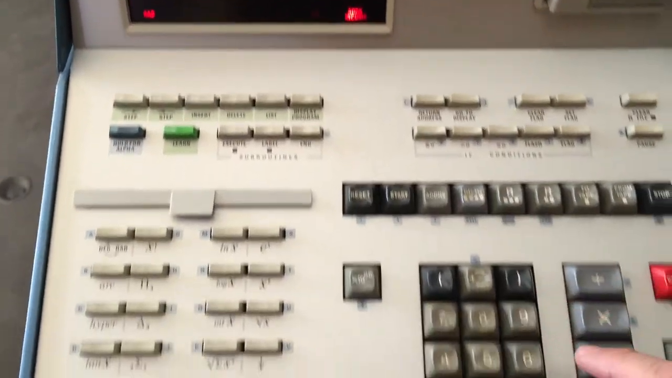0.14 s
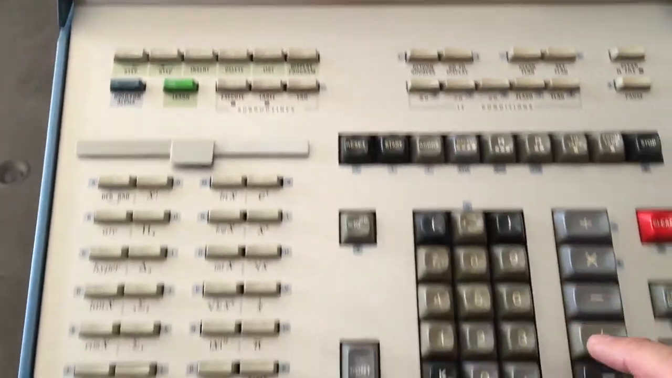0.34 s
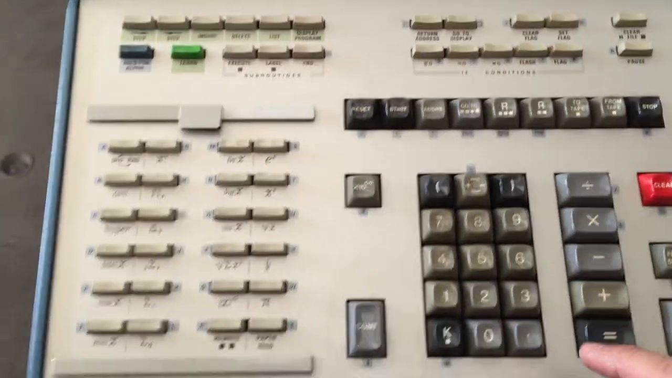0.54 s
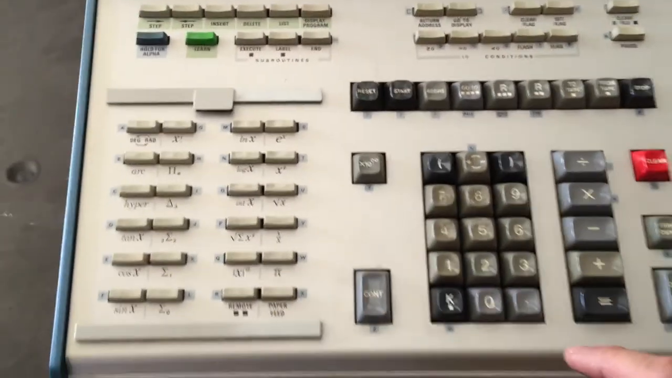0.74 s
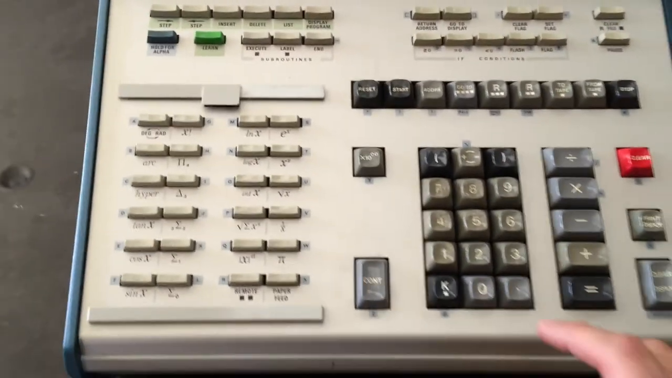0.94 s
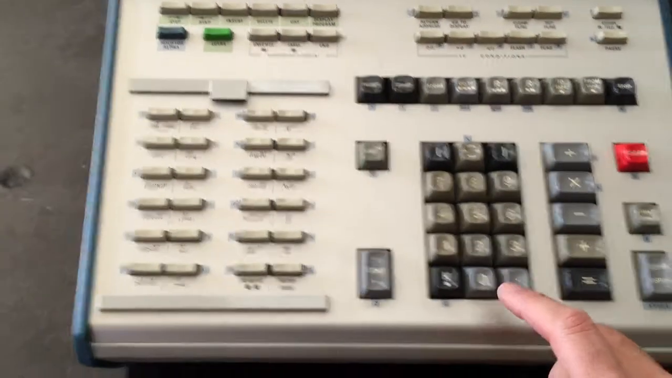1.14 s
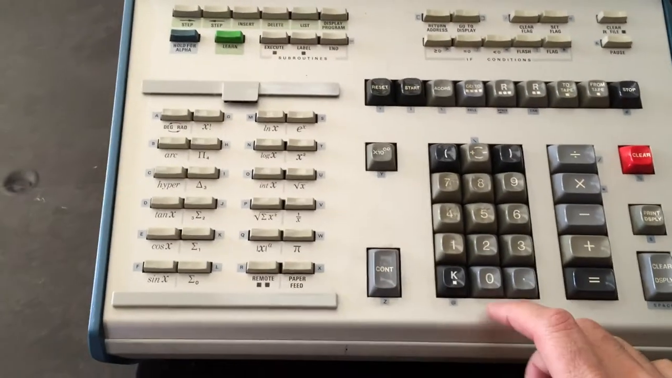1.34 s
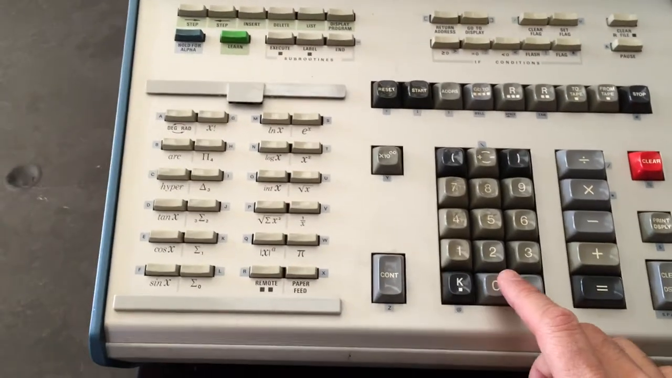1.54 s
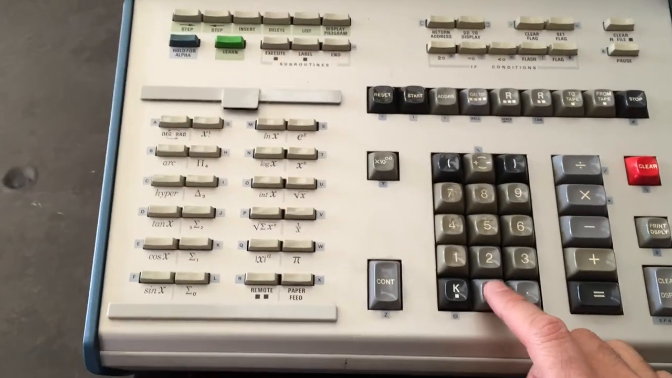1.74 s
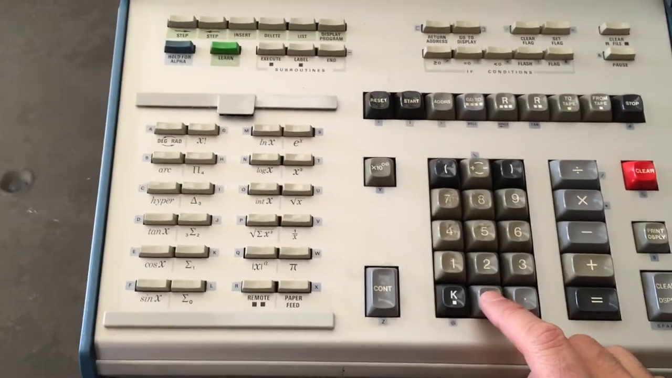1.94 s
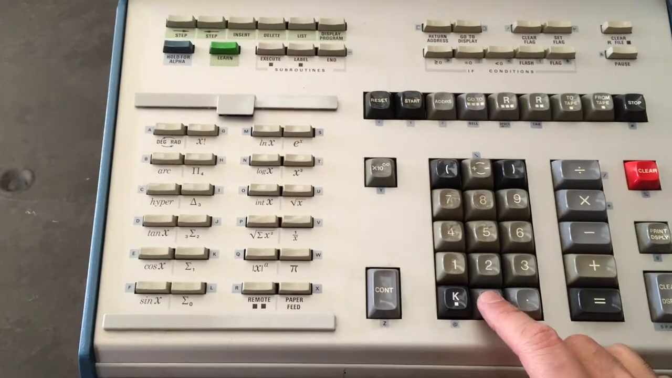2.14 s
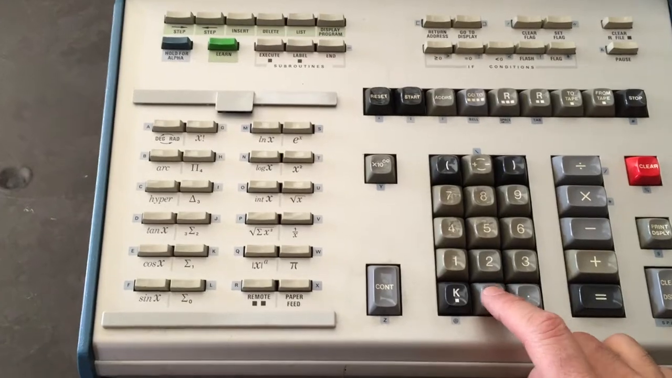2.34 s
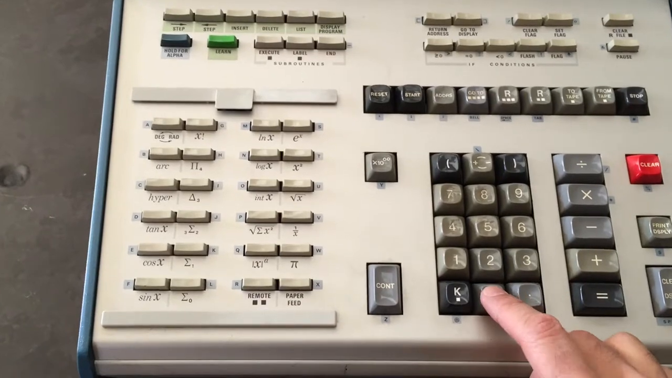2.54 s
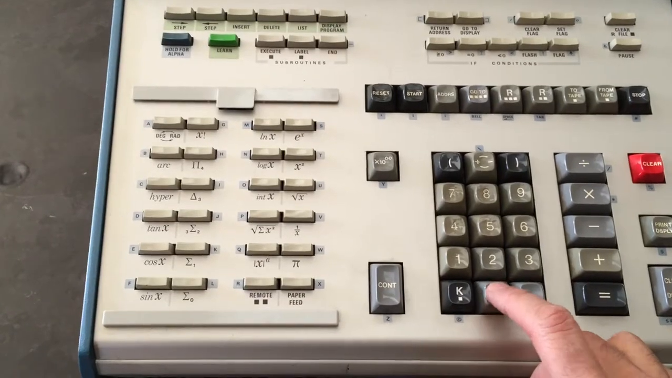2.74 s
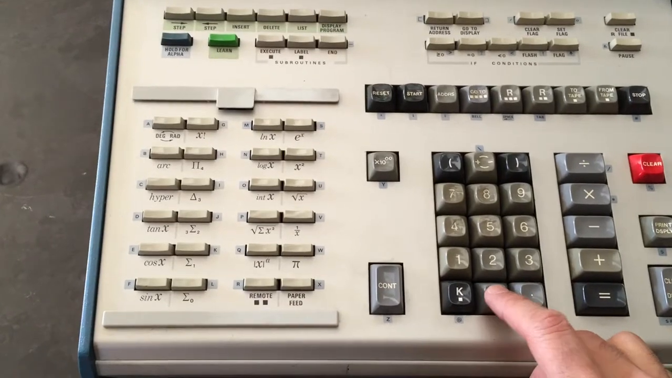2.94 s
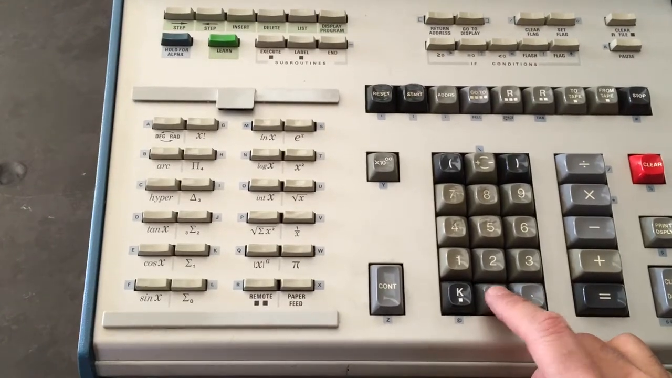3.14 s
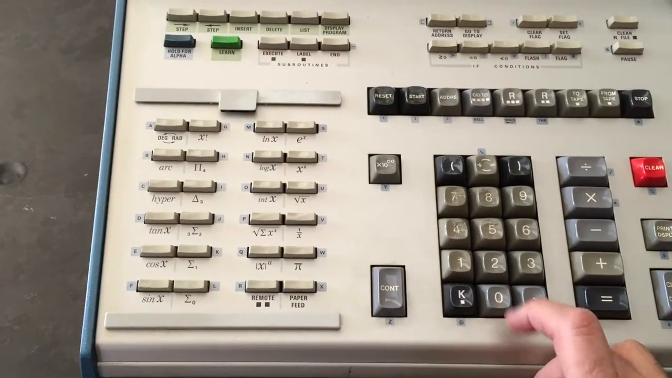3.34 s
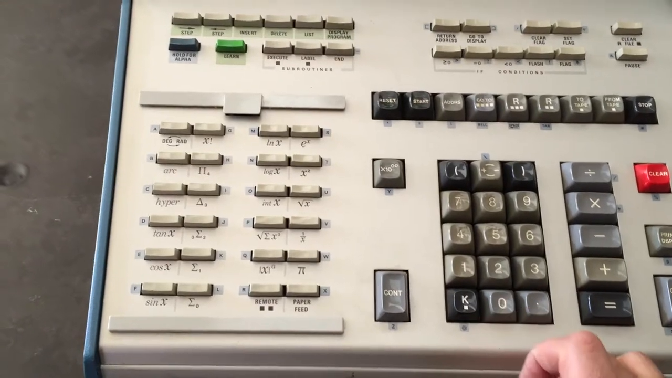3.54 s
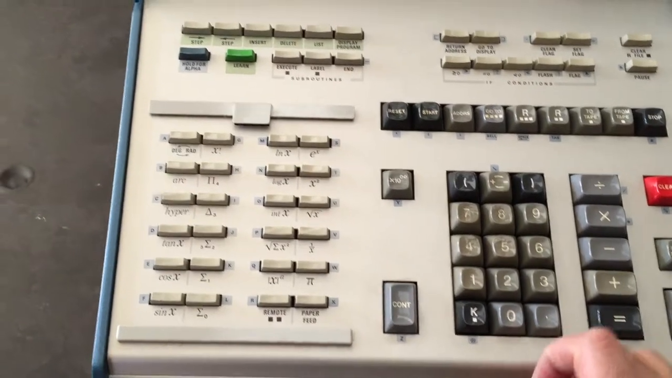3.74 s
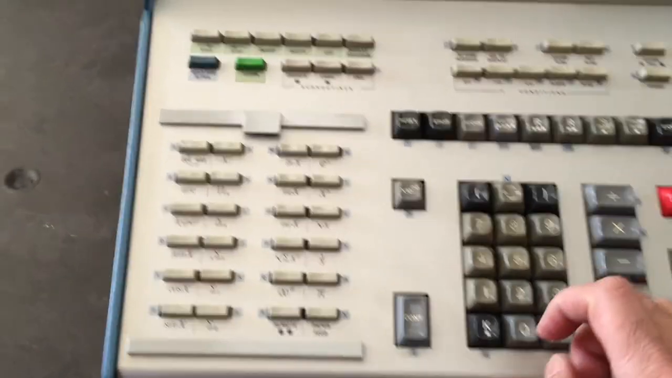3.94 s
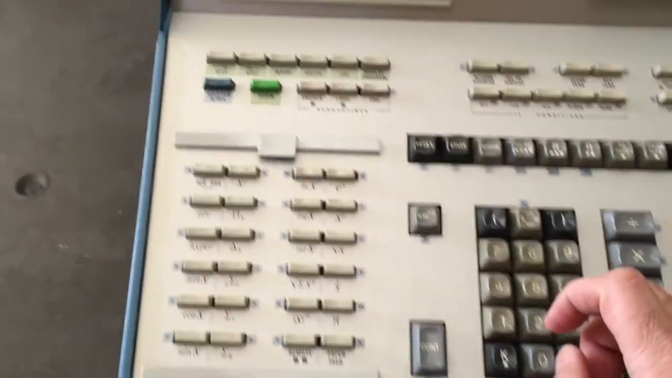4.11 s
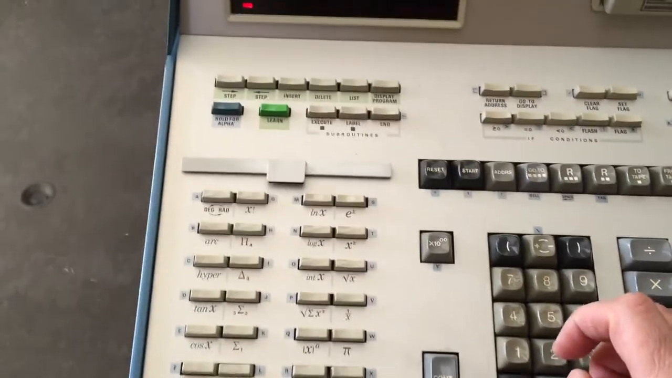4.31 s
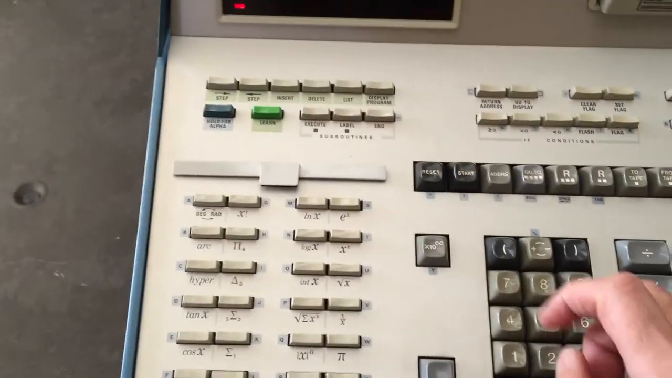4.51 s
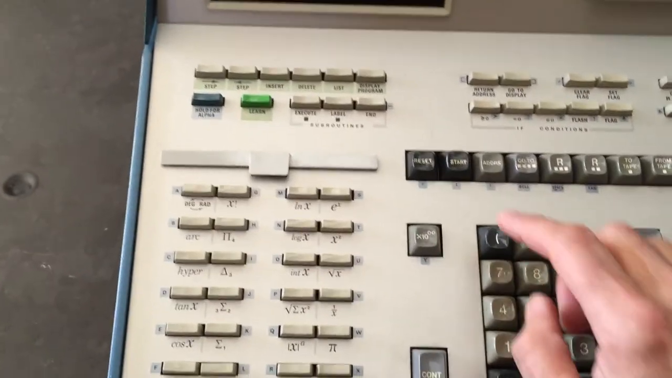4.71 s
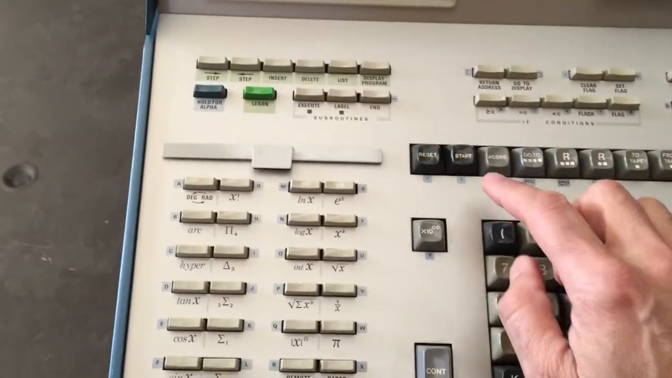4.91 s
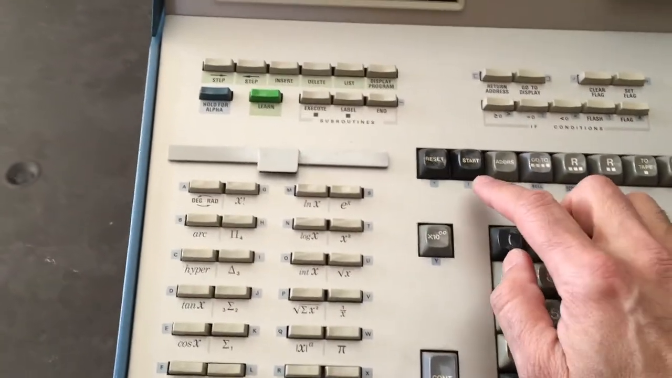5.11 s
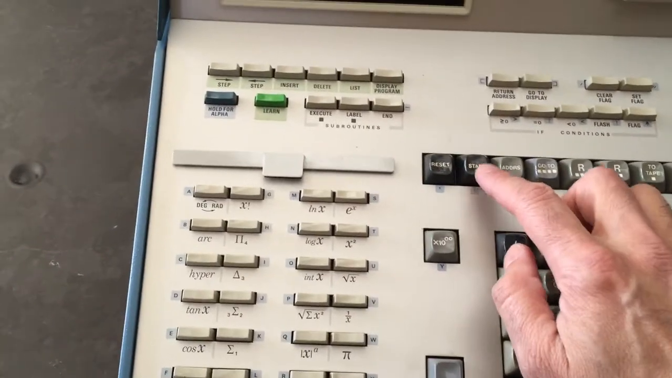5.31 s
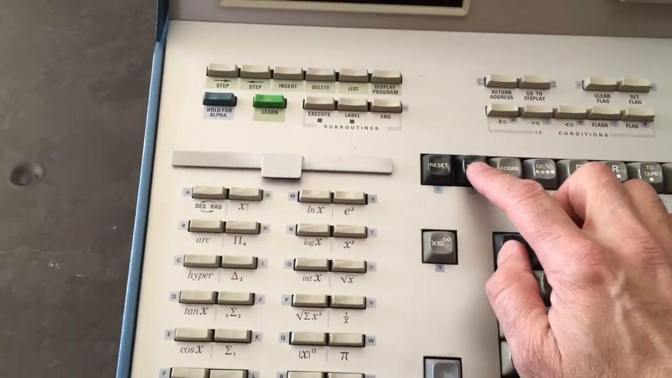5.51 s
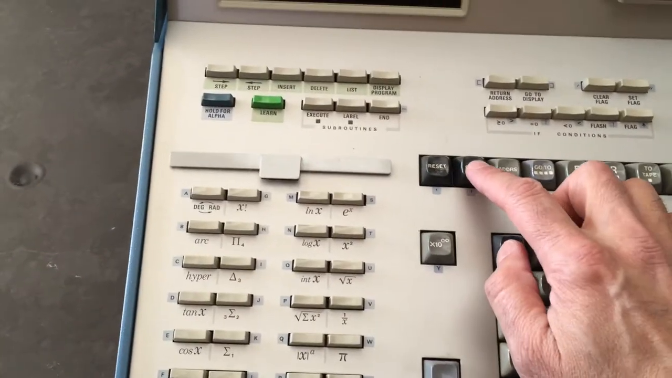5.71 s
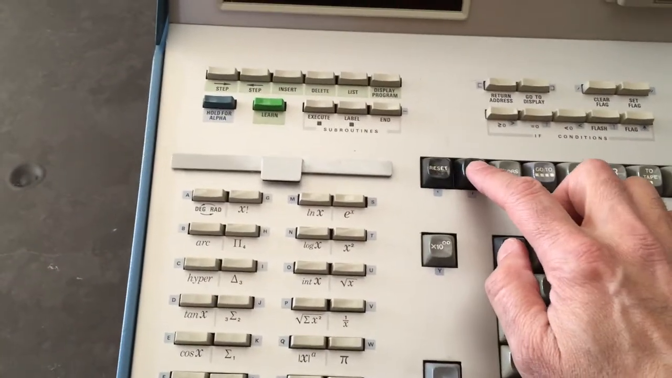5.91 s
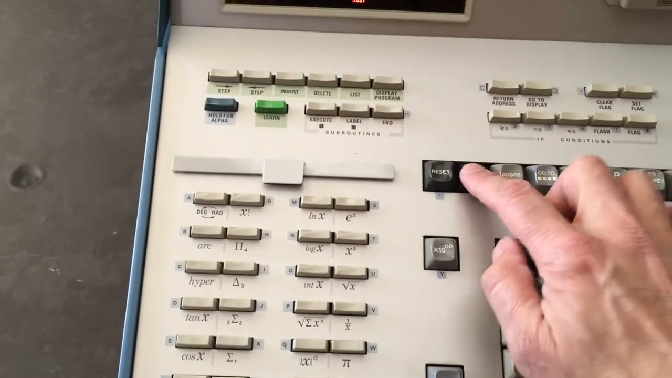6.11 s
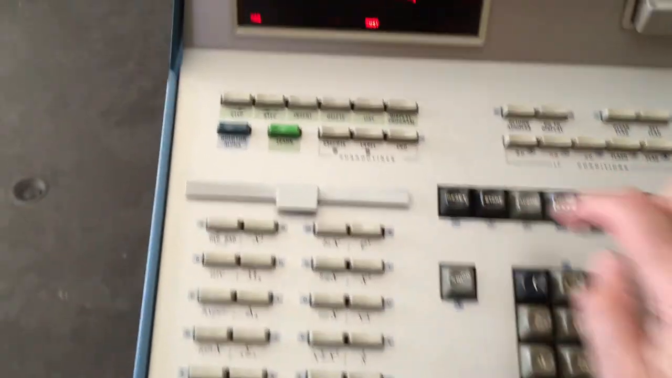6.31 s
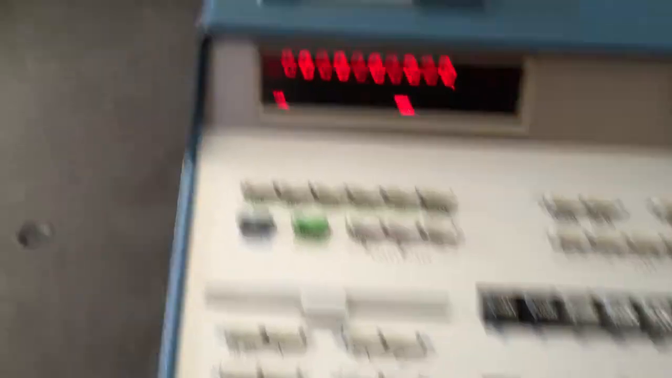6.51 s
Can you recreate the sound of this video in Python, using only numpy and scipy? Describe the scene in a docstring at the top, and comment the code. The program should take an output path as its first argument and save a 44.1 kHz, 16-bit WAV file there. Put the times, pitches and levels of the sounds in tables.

```python
"""A workroom, with the microphone of a hand-held camera on an old desktop calculator.
Fan tone, motor whirr, mains hum and moving air run throughout. In the first second the hand bumps the
camera softly and the motor's whine comes up. A fingertip squeaks at 1.55 s; from 2.2 s it presses one
digit key four times, and each time the key touches, bottoms out and rattles back up, ringing the case.
At 6.15 s a function key snaps down and up, and the lens ticks as it refocuses, over one last soft bump."""
import sys
import numpy as np
from scipy import signal
from scipy.fft import rfft, irfft, next_fast_len
from scipy.io import wavfile
from scipy.ndimage import uniform_filter1d

SR = 44100
rng = np.random.default_rng(int(sys.argv[2]) if len(sys.argv) > 2 else 0)


def unload_audio(sound):
    """Save the sound as a 16-bit wav file, at the path given as the first command line argument."""
    columns = np.transpose(np.atleast_2d(sound))
    # keep every value between -1 and 1, then stretch to whole-number steps
    steps = np.round(np.clip(columns, -1, 1) * 32767)
    wavfile.write(sys.argv[1], SR, steps.astype(np.int16))


N = 289296
TIME = np.arange(N) / SR
BAND_EDGES_HZ = np.geomspace(110, 17000, 19)
LEAD_SAMPLES = SR // 200   # space ahead of each click

# air moved by the fan: frequency_hz, density_db (per Hz)
FAN_AIR = [(22, -101), (48, -87.5), (85, -85.5), (135, -83), (280, -77), (400, -87), (660, -86),
           (790, -95.5), (1000, -92.5), (1900, -102), (2600, -110), (4700, -117), (6500, -118),
           (15000, -125)]
# fan and mains tones: pitch_hz, level_db, unsteadiness (0-1)
HUM_TONES = [(56, -64.5, 0.7), (83.6, -65.5, 0.9), (119.4, -63, 0.13), (262.3, -68, 0),
             (487.2, -53.5, 0.07), (600, -82, .5), (1224, -74.5, 0.1)]
# motor whirr: order (multiple of the turning rate), level_db
WHIRR_PARTIALS = [(10, -64), (20, -87.5), (23, -75), (31, -70.5), (32, -71), (33, -73), (34, -72.5),
                  (35, -70), (36, -75), (38, -72), (39, -67), (40, -71.5), (56, -81.5)]
# the motor's high whine: order, level_db (before the beam's gain)
WHINE_PARTIALS = [(67, -78.5), (68, -74.5), (69, -90), (70, -86), (72, -87), (74, -97.5)]
# the whine grows as the microphone moves into its beam: time_s, gain_db
WHINE_BEAM = [(.52, -10), (.9, .5), (6.5, 2.5)]
# soft bumps of the hand on the camera: centre_s, level_db, half_length_s
HAND_BUMPS = [(0.306, -49, 0.013), (0.435, -47, 0.016), (0.668, -49.5, 0.021), (.83, -54, 0.056),
              (6.42, -52, 0.074)]
# colour of the focus motor's hiss: frequency_hz, relative_db
LENS_COLOUR = [(800, 4.5), (2500, -3), (4000, 0), (6000, -2), (8000, -7), (10300, -5), (13000, -3),
               (15500, -10)]

# colour of the workroom's reverberation: frequency_hz, gain_db
REVERB_COLOUR = [(150, 22), (600, -3), (1200, -4.5), (1800, -7), (2500, -10.5), (4500, -12), (8000, -13),
                 (15000, -13)]
# its decay: frequency_hz, t60_s
REVERB_DECAY = [(150, 1), (1200, 0.46), (4000, 0.47), (8000, 0.63), (15000, 0.48)]
# first echoes from nearby walls: delay_s, gain_db
EARLY_ECHOES = [(0.0132, -13.5), (.0305, -23.5), (.036, -21.5), (.046, -24.5)]

# ringing modes of each key and the panel: pitch_hz, gain_db, t60_s
DIGIT_KEY_MODES = [ (302, 1, 0.055), (503, 4, 0.057), (635, 8.5, 0.061), (967, 6, 0.09), (1141, 15, 0.058),
                   (1399, 5, 0.035), (1576, 2.5, 0.1), (1671, 6, 0.086), (1867, 7, 0.056),
                   (2022, 6.5, 0.058), (2408, 7, 0.024), (2480, 10.5, 0.047), (2810, 1.5, 0.032),
                   (2980, -0.5, 0.028), (3430, 6, 0.026), (3676, 0.5, 0.034), (3950, -1.5, 0.046),
                   (4480, -10, 0.037), (5440, -9, 0.036), (6018, -1.5, 0.026), (7050, -15, 0.028),
                   (9000, -13, .015), (11240, -17.5, 0.011)]
FUNCTION_KEY_MODES = [ (364, 4.5, 0.044), (710, 7, 0.049), (920, 11, .04), (1127, 22.5, 0.032),
                      (1190, 21, .03), (1442, 25, 0.033), (1720, 18, 0.027), (1847, 23, 0.03),
                      (1990, 4, 0.028), (2150, 11, .022), (2450, 3, 0.026), (2540, 9, 0.027),
                      (3126, 16, .025), (3500, 5, 0.025), (3700, 16, 0.036), (3920, 12.5, 0.026),
                      (4250, 6, 0.03), (4570, 8, 0.025), (6600, -5, .018), (9100, -10, 0.024),
                      (11700, -2, .018)]
# the crowd of short-lived case modes under each key: frequency_hz, gain_db
DIGIT_CASE_COLOUR = [(150, -25), (600, 0.5), (900, 5.5), (1200, 6.5), (1800, 1), (2600, 4.5), (3800, -2.5),
                     (5000, -6.5), (6200, -17), (8000, -20.5), (12000, -29), (16000, -37)]
FUNCTION_CASE_COLOUR = [(150, -18), (600, -1), (1400, 18), (2700, 7), (4000, 12), (5500, -9), (7000, -3.5),
                        (10000, -15), (12000, -17), (16000, -24)]
# how each kind of contact lands, by name: thud_db, treble_db, board_ring_db, rattle_s
CONTACT_KINDS = { "touch": (-1, 6, 3, .0018), "catch": (-6, 7, 3, .003), "bottom": (-1, -6, -3.5, .00055),
                 "lift": (5.5, -11, 1, .004), "scrape": (-1, 4, 5, .006), "top stop": (1.5, 4, 3, .004),
                 "rebound": (1, 3, 1, .0028), "snap down": (2, .5, -2, .00063),
                 "snap up": (7, -4, -3, .0024)}
# the digit key goes down:
# bottom_s, strength_db, treble_db, travel_s, catch_lead_s, touch_db, touch_ring_db
DIGIT_DOWNSTROKES = [(2.2425, 0, -1, .019, .0087, -32, 0), (2.6287, -1, 9, .009, .0055, -24, 0),
                     (2.9372, -2, -4, .0202, .008, -18, 0), (3.2402, 0, -3, .0175, .009, -15, 12)]
# it springs back:
# top_stop_s, strength_db, ring_db, scrape_lead_s, lift_db, rebound_delay_s, rebound_db, rebound_treble_db
DIGIT_UPSTROKES = [(2.4475, -17.5, 2, .034, -26, .0135, -17, 0),
                   (2.8038, -11, 1, .033, -34, .0066, -12.5, 10),
                   (3.086, -12, 5, .026, -32, .013, -16.5, 6),
                   (3.3703, -9.5, -4, .0205, -19.5, .0095, -14.5, -9)]


def from_db(db):
    """Decibels to gain."""
    return 10 ** (np.asarray(db) / 20)


def rms_one(x):
    """Scale to an rms of one."""
    return x / np.sqrt(np.mean(np.abs(x) ** 2) + 1e-20)


def at_hz(points, hz):
    """Read a table along a log-frequency axis."""
    knots, values = np.transpose(points)
    return np.interp(np.log(np.maximum(hz, 1)), np.log(knots), values)


def coloured_noise(spectrum):
    """Steady noise with the given level per Hz."""
    size = next_fast_len(N)
    gain = from_db(at_hz(spectrum, np.arange(size // 2 + 1) * SR / size))
    return irfft(rfft(rng.standard_normal(size)) * gain, size)[:N] * np.sqrt(SR / 2)


def drift(rate_hz):
    """A smooth random wander with an rms of one."""
    knots = rng.standard_normal(int(2 * rate_hz * N / SR) + 2)
    fine = signal.resample_poly(knots, 10, 1)
    return rms_one(np.interp(TIME * 20 * rate_hz, np.arange(len(fine)), fine))


def tone(hz, level_db, unsteady, waver_hz):
    """A sine whose level and phase waver."""
    waver = 1 + unsteady * (drift(waver_hz) + 1j * drift(waver_hz)) / np.sqrt(2)
    carrier = np.exp(2j * np.pi * (hz * TIME + rng.random()))
    return from_db(level_db) * rms_one(np.real(waver * carrier))


def machine_hum(motor_hz=28.255):
    """The bed: fan and mains tones, whirr and whine at multiples of the motor's turning rate, and air."""
    tones = sum(tone(hz, db, unsteady, waver_hz=3.2) for hz, db, unsteady in HUM_TONES)
    whirr = sum(tone(order * motor_hz, db, unsteady=0.3, waver_hz=2.5) for order, db in WHIRR_PARTIALS)
    whine = sum(tone(order * motor_hz, db, unsteady=0.55, waver_hz=10) for order, db in WHINE_PARTIALS)
    beam = from_db(np.interp(TIME, *np.transpose(WHINE_BEAM)))
    return tones + whirr + beam * whine + coloured_noise(FAN_AIR)


def handling_bumps():
    """Handling noise at the microphone: dull swells of rumble from the hand that holds the camera."""
    swells = sum(from_db(db) * np.exp(-((TIME - s) / half_s) ** 2 / 2) for s, db, half_s in HAND_BUMPS)
    rumble = coloured_noise([(30, -20), (70, -4), (150, 5), (280, 1.5), (450, -4), (1200, -54)])
    return swells * rms_one(rumble)


def lens_ticks(start_s=6.205, step_s=.05, quick_step_s=.019, half_s=0.0068, level_db=-55.5):
    """Each step of the camera's focus motor is a short soft hiss: seven even steps, three quick ones."""
    even = start_s + step_s * np.arange(7)
    quick = even[-1] + quick_step_s * (1 + np.arange(3))
    bursts = sum(1 / (1 + ((TIME - s) / half_s) ** 4) for s in [*even, *quick])
    return from_db(level_db) * bursts * rms_one(coloured_noise(LENS_COLOUR))


def fingertip_squeak(centre_s=1.553, half_s=.0045):
    """A tiny squeak as the fingertip settles on the key."""
    swell = np.exp(-((TIME - centre_s) / half_s) ** 2 / 2)
    return swell * tone(hz=3350, level_db=-70, unsteady=.4, waver_hz=60)


def with_wall_echoes(x, dull_hz=5000):
    """The direct sound reaches the microphone first, then dulled echoes from the nearby walls."""
    dull = signal.lfilter(*signal.butter(1, dull_hz, fs=SR), x)
    return x + sum(from_db(db) * np.pad(dull, (round(delay_s * SR), 0))[:N]
                   for delay_s, db in EARLY_ECHOES)


def diffuse(x, colour, t60s, build_s):
    """Countless overlapping modes of room or case: a noise response that builds and dies band by band."""
    t, response = TIME[:SR], 0
    for low, high in zip(BAND_EDGES_HZ, BAND_EDGES_HZ[1:]):
        hz = np.sqrt(low * high)
        bandpass = signal.butter(2, [low, high], "band", fs=SR, output="sos")
        noise = signal.sosfilt(bandpass, rng.standard_normal(SR))
        tail = noise * from_db(-60 * t / at_hz(t60s, hz)) * (1 - np.exp(-t / build_s))
        response += from_db(at_hz(colour, hz)) * rms_one(tail) * np.sqrt(2 * (high - low)) / SR
    return signal.fftconvolve(x, response)[:N]


def resonance(x, hz, t60_s):
    """One ringing mode, with a gain of one at its peak."""
    radius = from_db(-60 / (t60_s * SR))
    feedforward = np.array([1, 0, -1]) * (1 - radius ** 2) / 2
    feedback = [1, -2 * radius * np.cos(2 * np.pi * hz / SR), radius ** 2]
    return signal.lfilter(feedforward, feedback, x + 1e-18)


def rattle(length_s, even_split_s=0.006):
    """A click and the loose key's dying chatter; the longer the chatter, the weaker the click."""
    t = TIME[:SR // 10]
    chatter_share = length_s ** 2 / (length_s ** 2 + even_split_s ** 2)
    push = rng.standard_normal(len(t)) * rng.exponential(1, len(t)) * np.exp(-t / length_s)
    push *= np.sqrt(chatter_share / np.sum(push ** 2))
    push[0] += np.sqrt(1 - chatter_share)   # the click
    # chatter spreads the blow in time but leaves its broad colour even
    spectrum = rfft(np.pad(push, (LEAD_SAMPLES, 0)))
    broad_power = uniform_filter1d(np.abs(spectrum) ** 2, size=110)
    return irfft(spectrum / np.sqrt(broad_power + 1e-12))


def contact(kind, start_s, strength_db, brighter_db=0, hollower_db=0):
    """One contact of a key, with the colour and rattle length of its kind."""
    thud_db, treble_db, ring_db, rattle_s = CONTACT_KINDS[kind]
    return start_s, strength_db, thud_db, treble_db + brighter_db, ring_db + hollower_db, rattle_s


def contact_force(contacts, treble_hz, thud_hz, board_hz=1146, board_t60_s=0.0085):
    """The force on a key, one rattle a contact: solid ones thud, glancing ones are thin and bright."""
    force = np.zeros(N + SR)
    lowpass = signal.butter(1, thud_hz, fs=SR)
    highpass = signal.butter(1, treble_hz, "high", fs=SR)
    for start_s, strength_db, thud_db, treble_db, ring_db, rattle_s in contacts:
        push = rattle(rattle_s)
        push += (from_db(thud_db) - 1) * signal.lfilter(*lowpass, push)
        push += (from_db(treble_db) - 1) * signal.lfilter(*highpass, push)
        # a push along the stem sets the key board ringing
        push += (from_db(ring_db) - 1) * resonance(push, board_hz, board_t60_s)
        start = round(start_s * SR) - LEAD_SAMPLES
        force[start:start + len(push)] += from_db(strength_db) * push
    return force[:N]


def key_in_room(force, modes, case_colour, case_t60s, ring_send, swell_cycles=3.1):
    """The force rings the key's own modes and the dense ones of the case; the room answers both."""
    # each mode takes a moment to spread over the panel before it rings fully
    rings = sum(from_db(db) * resonance(resonance(force, hz, swell_cycles / hz), hz, t60_s)
                for hz, db, t60_s in modes)
    case = diffuse(force, case_colour, case_t60s, build_s=.0001)
    # summed over all directions the case radiates a smooth spectrum, so the room gets less of the rings
    radiated = [(hz, at_hz(case_colour, hz) + at_hz(REVERB_COLOUR, hz)) for hz in BAND_EDGES_HZ]
    case_reverb = diffuse(force, radiated, REVERB_DECAY, build_s=0.001)
    ring_reverb = diffuse(rings, REVERB_COLOUR, REVERB_DECAY, build_s=0.0047)
    return with_wall_echoes(rings + case) + case_reverb + ring_send * ring_reverb


def return_spring(t60_s=0.35, sensitivity=.8):
    """The digit key's spring shivers after each release, more so after a hard, bright rebound."""
    dying = sum((TIME > s) * from_db(sensitivity * (rebound_db + treble_db) - 60 * abs(TIME - s) / t60_s)
                for s, *_, rebound_db, treble_db in DIGIT_UPSTROKES)
    return dying * tone(hz=4400, level_db=-56, unsteady=2.3, waver_hz=110)


def function_key(down_s=6.1497, down_db=-2, up_s=6.2838, up_db=-14.5):
    """A quick jab: a light touch, then a hard snap down and a duller knock up that each bounce once."""
    contacts = [contact("touch", down_s - .005, strength_db=-28),
                contact("snap down", down_s, down_db),
                contact("snap down", down_s + .0029, down_db - 6),
                contact("snap up", up_s, up_db),
                contact("snap up", up_s + .007, up_db - 8)]
    force = contact_force(contacts, treble_hz=3920, thud_hz=1400)
    return key_in_room(force, FUNCTION_KEY_MODES, FUNCTION_CASE_COLOUR,
                       case_t60s=[(500, 0.063), (3000, 0.029), (12000, 0.033)], ring_send=0.33)


def digit_key(catch_db=-17.5, scrape_db=-23.5, lift_lead_s=.021):
    """Four presses: the stem rubs its guide both ways, and the key strikes a stop at each end."""
    contacts = []
    for s, strength_db, treble_db, travel_s, catch_lead_s, touch_db, ring_db in DIGIT_DOWNSTROKES:
        contacts += [contact("touch", s - travel_s, touch_db, hollower_db=ring_db),
                     contact("catch", s - catch_lead_s, catch_db),
                     contact("bottom", s, strength_db, brighter_db=treble_db)]
    for s, strength_db, ring_db, lead_s, lift_db, delay_s, rebound_db, treble_db in DIGIT_UPSTROKES:
        contacts += [contact("lift", s - lead_s - lift_lead_s, lift_db),
                     contact("scrape", s - lead_s, scrape_db),
                     contact("top stop", s, strength_db, hollower_db=ring_db),
                     contact("rebound", s + delay_s, rebound_db, brighter_db=treble_db)]
    force = contact_force(contacts, treble_hz=5200, thud_hz=2000)
    return key_in_room(force, DIGIT_KEY_MODES, DIGIT_CASE_COLOUR,
                       case_t60s=[(500, .06), (3000, 0.042), (12000, 0.046)], ring_send=0.28)


def scene():
    """At the microphone, in mono: both keys in the workroom, over the hum and the camera's own noises."""
    keys = digit_key() + function_key() + return_spring() + fingertip_squeak()
    return (keys + machine_hum() + handling_bumps() + lens_ticks())[None]


def record(dry):
    """The treble is cut steeply above 15.5 kHz."""
    return signal.sosfilt(signal.ellip(10, .1, 70, 15500, fs=SR, output="sos"), dry)


dry = scene()
out = record(dry)
unload_audio(out)
```